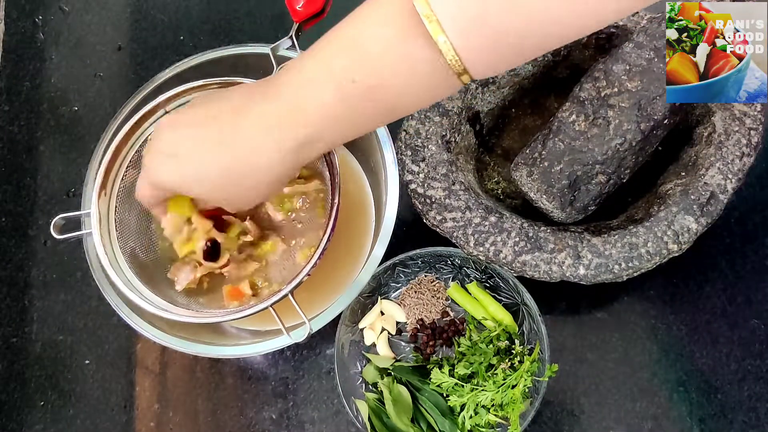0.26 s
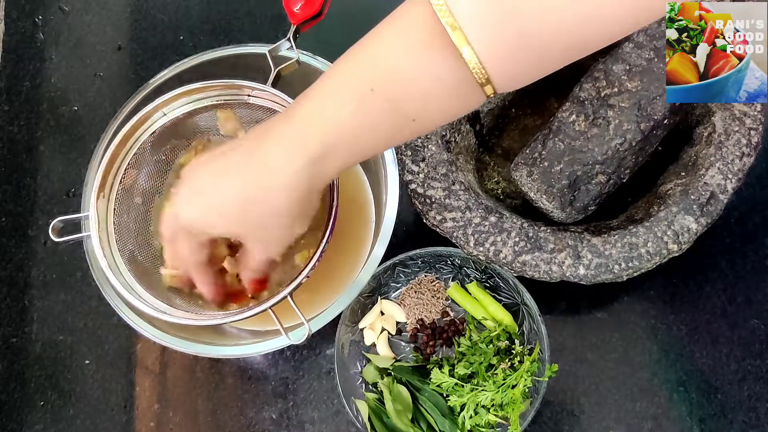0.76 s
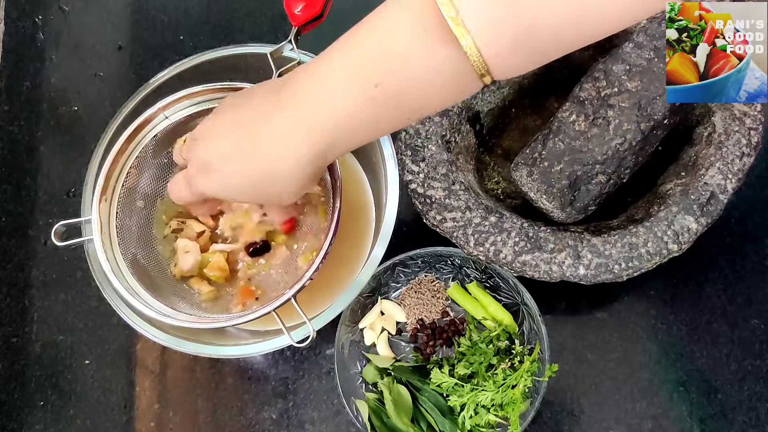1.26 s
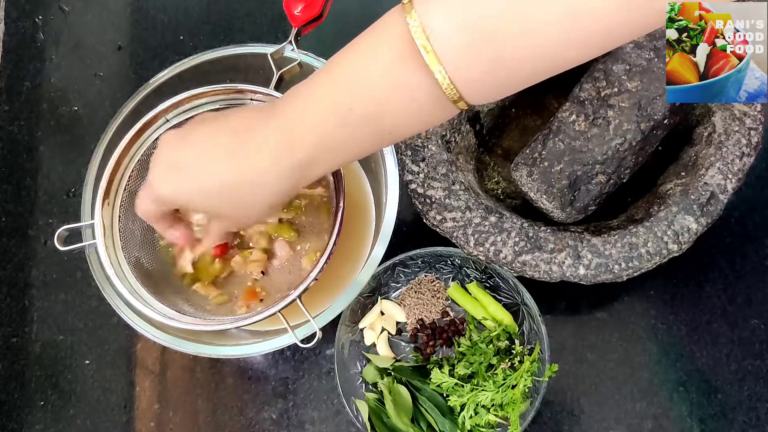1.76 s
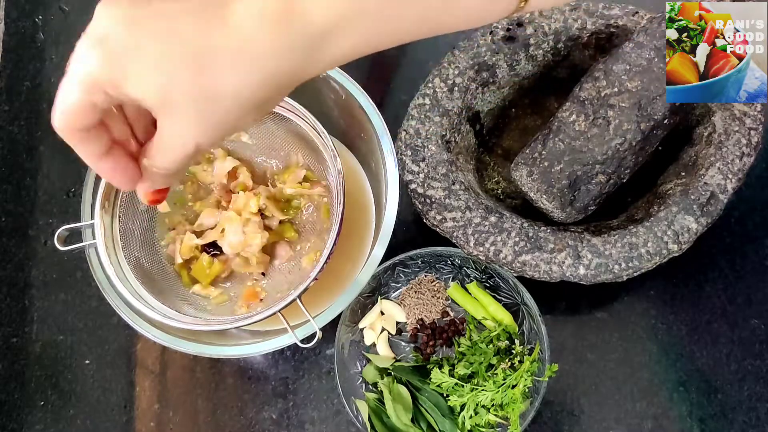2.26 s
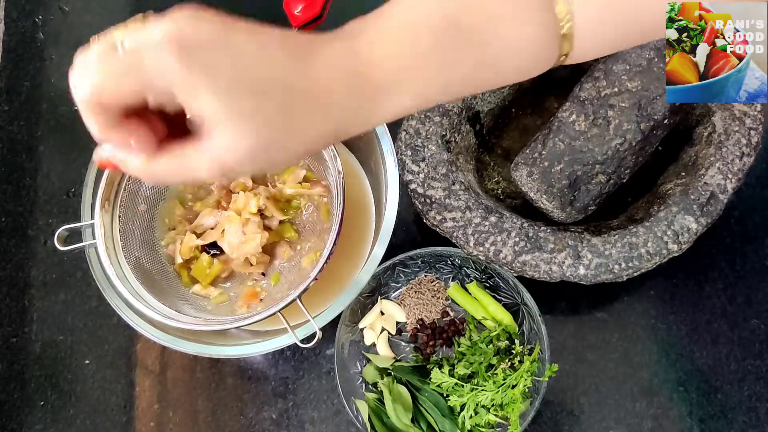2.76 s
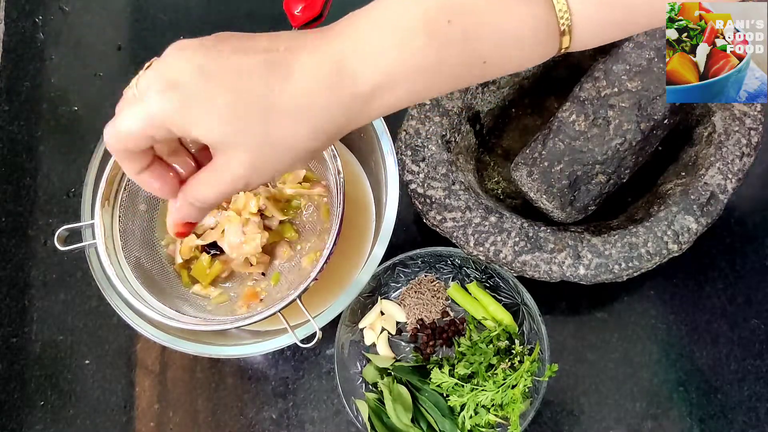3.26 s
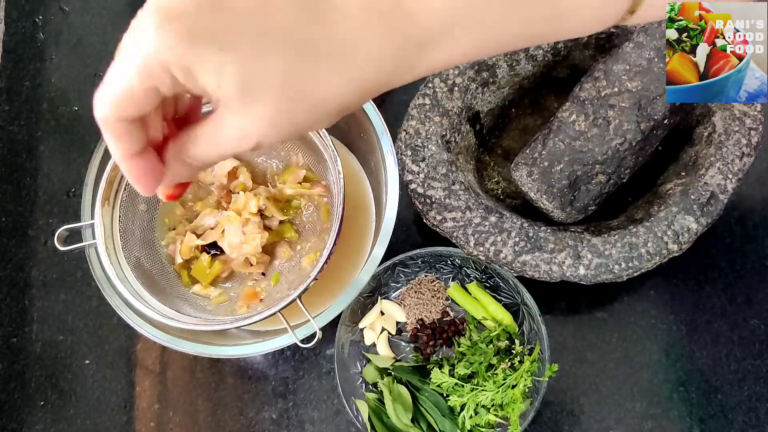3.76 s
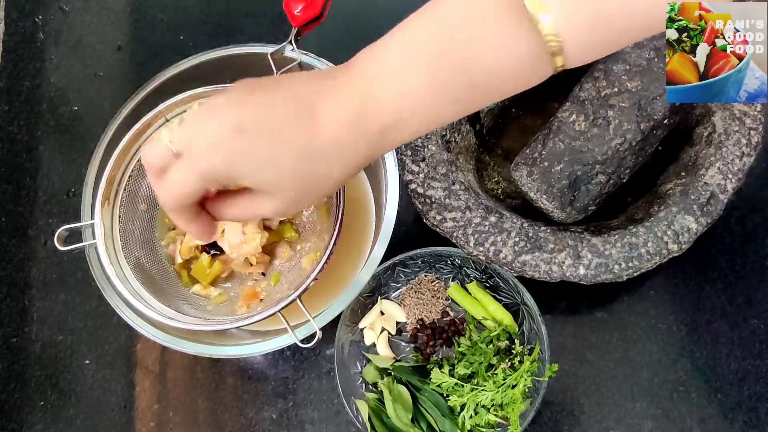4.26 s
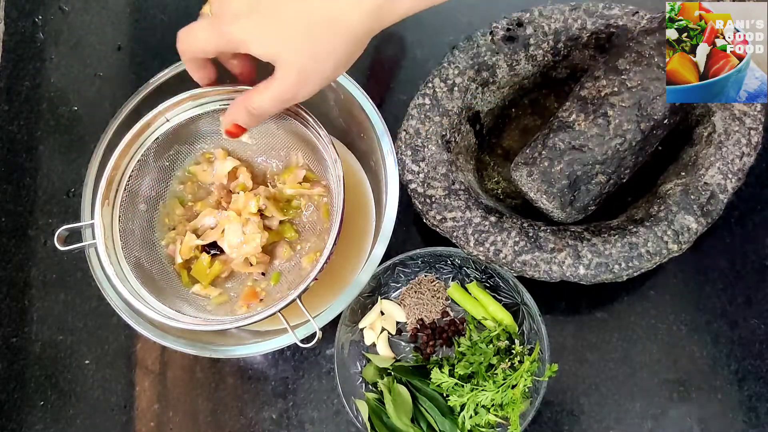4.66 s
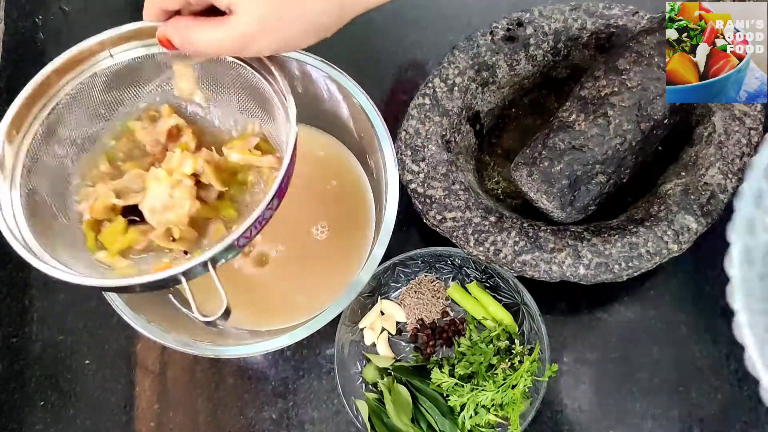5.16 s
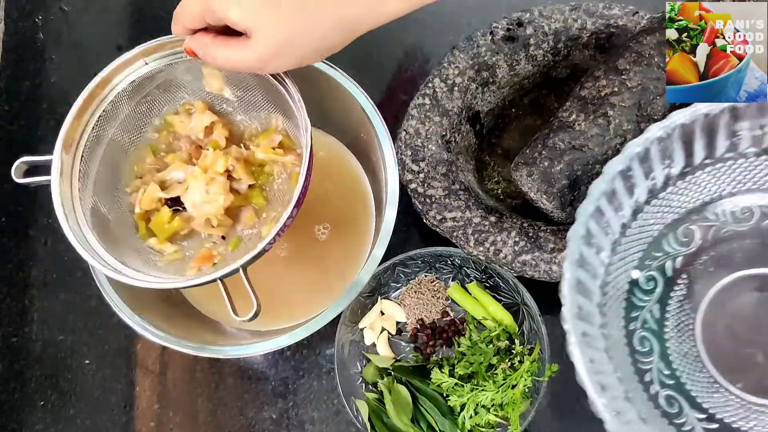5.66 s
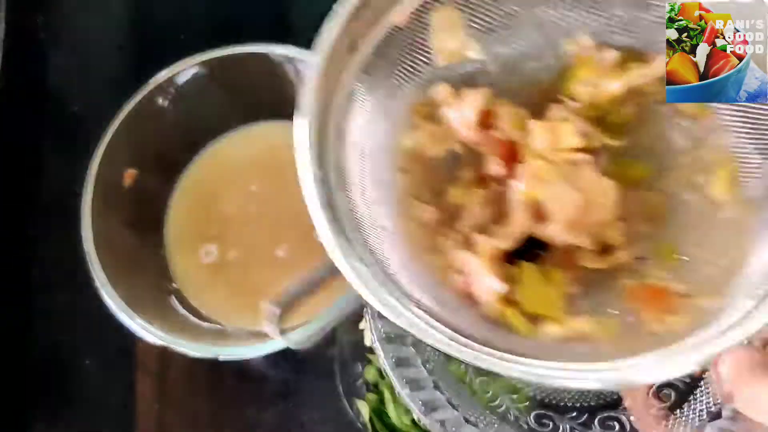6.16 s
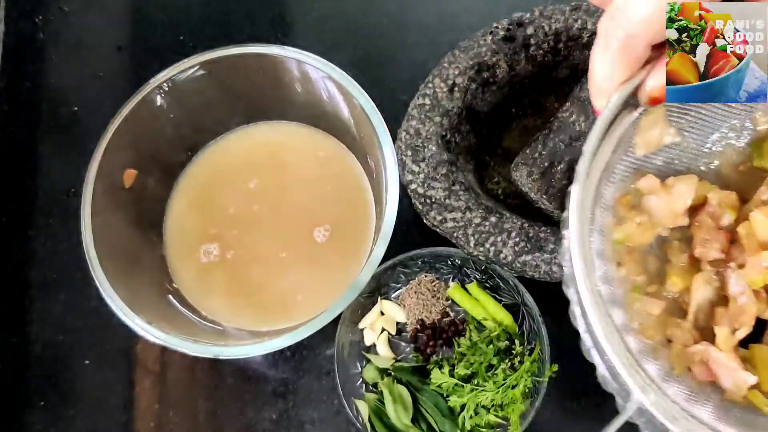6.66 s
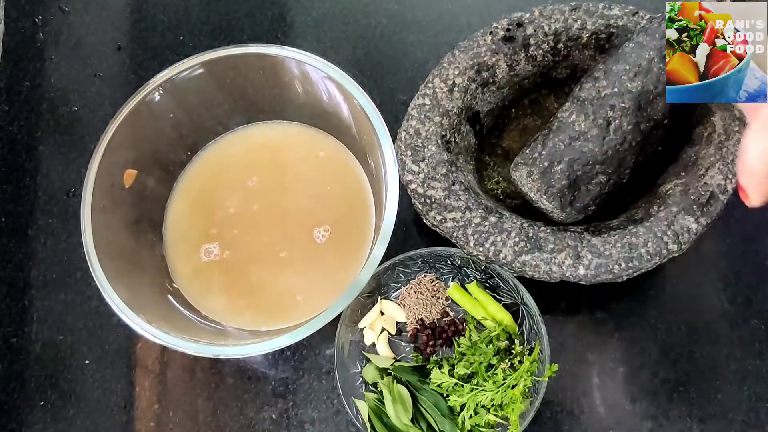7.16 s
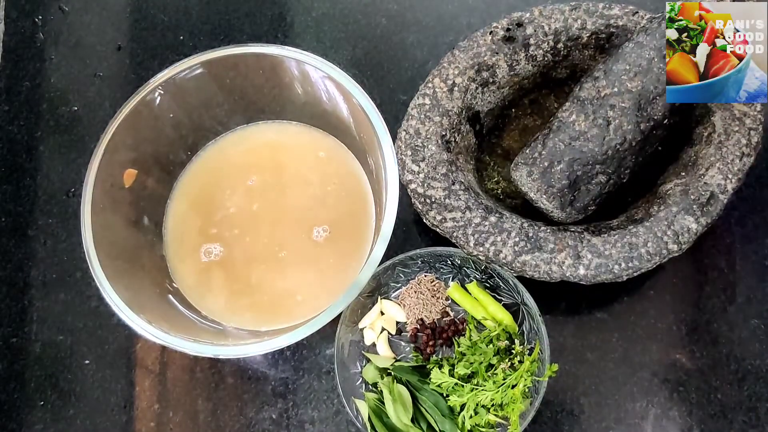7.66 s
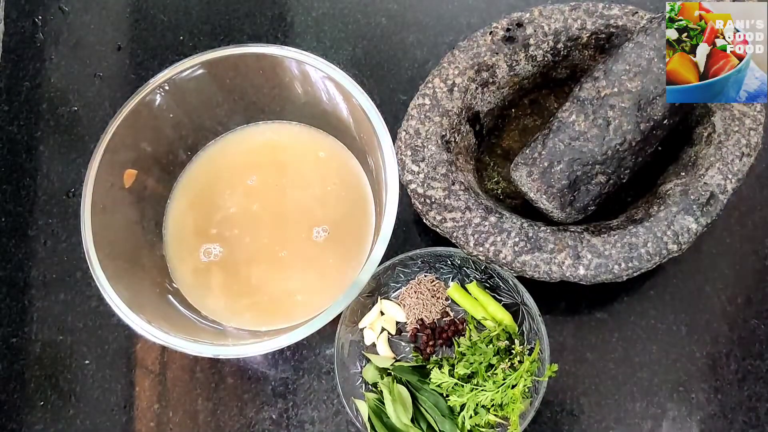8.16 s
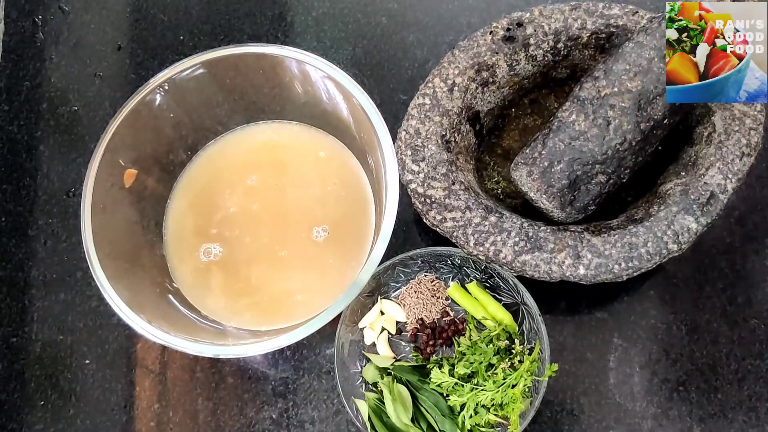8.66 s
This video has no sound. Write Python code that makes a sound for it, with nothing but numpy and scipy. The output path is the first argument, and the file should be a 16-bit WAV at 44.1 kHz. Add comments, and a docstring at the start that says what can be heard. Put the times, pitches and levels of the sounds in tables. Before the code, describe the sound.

A lively kitchen heard in close stereo. From 0 to about 2.7 seconds fingers press wet pulp through a metal strainer slightly to the left: moist crackle, low squelches and popping air pockets, with a sharp snap near 0.45 and more pops around 1.6. Squeezing thins out, with crisp snaps near 3.7 and soft wet rustles from 4.3 to 5; a tiny drip falls at 5.9. A fan's draught rumbles in uneven low gusts, strongest left, over a quiet room drone. Sparrows chirp hoarsely outside throughout, above a distant twittering flock. Light glass and metal touches at 6.6, 6.9 and 7.1 lead to a loud, bright clink at 7.65 with a short room echo. Bangles jingle faintly around 7.4. A nearby bird on the left gives five quick rising whistles from 7.2 to 8.1. One last squelch comes near 8.6.

```python
"""Pressing wet pulp through a strainer

Fingers press pulp through a steel strainer: noise bursts of random clicks, and pops of ringing air pockets.
Strainer and glass plate are set down with a clink, and bangles jingle: damped modes excited by short blows.
A fan's draught rumbles, strongest on the left, over the room's drone: shaped noise and noisy room modes.
Sparrows chatter outside and one bird whistles near: gliding, unsteady sines with diffuse echoes."""
import sys
import numpy as np
from scipy import signal
from scipy.fft import rfft, irfft
from scipy.io import wavfile
from scipy.ndimage import uniform_filter1d

SR = 44100
rng = np.random.default_rng(int(sys.argv[2]) if len(sys.argv) > 2 else 0)


def output_pcm(signal):
    """Save a mono or channel-first signal as 16-bit PCM at the path in sys.argv[1].

    Samples are clipped to [-1, 1] before scaling.
    """
    pcm = np.clip(np.atleast_2d(signal).T, -1, 1) * 32767
    wavfile.write(sys.argv[1], SR, np.round(pcm).astype(np.int16))


N = 393143
MIC_GAP_M, SOUND_SPEED_M_PER_S = .17, 343


def amp(db):
    """Decibel law: 20 dB is a tenfold amplitude."""
    return 10 ** (np.asarray(db) / 20)


def evened(x):
    """Normalization to an rms of 1."""
    return x / np.sqrt(np.mean(x ** 2) + 1e-20)


def slow_noise(length, size):
    """Low-pass filtering: white noise smoothed by two moving averages of size samples, with rms 1."""
    smooth = uniform_filter1d(rng.standard_normal(length), size=size)
    return evened(uniform_filter1d(smooth, size=size))


def read(points, hz):
    """Interpolation of a spectral curve along logarithmic frequency."""
    f, value = np.transpose(points)
    return np.interp(np.log(hz + 1), np.log(f + 1), value)


def curve(rows):
    """Linear interpolation of a level over the time of the scene."""
    return np.interp(np.arange(N) / SR, *np.transpose(rows))


def add(mix, s, sound, lag=0, pan_db=0):
    """Stereo by time and level differences: the left side hears lag samples later and pan_db louder."""
    for side, late, db in ((0, max(lag, 0), pan_db / 2), (1, max(-lag, 0), -pan_db / 2)):
        part = mix[side, round(s * SR + late):][:len(sound)]
        part += amp(db) * sound[:len(part)]


def noise(db_of, length, size, diffuse=True):
    """Diffuse-field coherence: a noise pair of spectrum db_of(Hz, s), alike at both sides only in the bass."""
    frames, hz = 4 * length // size + 5, np.fft.rfftfreq(size, 1 / SR)[:, None]
    a, b, c, d = rng.standard_normal((frames, len(hz), 4)).T
    shared, separate = a + 1j * b, c + 1j * d
    coherence = np.sinc(2 * hz * MIC_GAP_M / SOUND_SPEED_M_PER_S) * diffuse
    z = np.array([shared, coherence * shared + np.sqrt(1 - coherence ** 2) * separate])
    z *= amp(db_of(hz, np.arange(frames) * size / 4 / SR))
    pair = signal.istft(z, nperseg=size, noverlap=3 * size // 4)[1]
    return evened(pair[:, :length])


def reverb(x, t60_of, gap_s):
    """Exponential decay of a diffuse field: the left signal excites a unit-energy tail that dies band by band."""
    tail = noise(lambda hz, t: -60 * t / t60_of(hz), SR, size=256)
    tail = np.pad(tail, ((0, 0), (round(gap_s * SR), 0))) / np.sqrt(SR)
    return signal.oaconvolve(x[:1], tail, axes=1)[:, :N]


def ring(modes, tilt_db=0, spread_db=0):
    """Modal synthesis: a sum of dying sines whose levels vary at random from blow to blow."""
    t = np.arange(SR // 2) / SR
    total = 0
    for hz, db, t60 in modes:
        start_db = db + tilt_db * np.log2(hz / 5000) + spread_db * rng.standard_normal()
        total = total + amp(start_db - 60 * t / t60) * np.sin(2 * np.pi * hz * t)
    return total


def tone(hz, db, taper):
    """Phase is the integral of frequency: a gliding sine of rms level db with tapered ends."""
    phase = 2 * np.pi * np.cumsum(hz) / SR
    return np.sqrt(2) * amp(db) * np.sin(phase) * signal.windows.tukey(len(hz), taper)


def draught():
    """Turbulent pressure is uncorrelated at spaced points: lumpy noise, independent on the two sides."""
    # strength of the draught before lumps and sides: start_s, level_db
    strength = [(0.0, -49), (1.34, -33), (1.37, -41.5), (1.66, -30.5), (1.91, -44.5), (2.38, -30),
                (2.75, -39.5), (2.85, -34.5), (4.37, -35.5), (4.49, -48), (4.57, -35.5), (4.96, -46),
                (5.04, -35), (5.36, -44), (6.11, -37.5), (6.16, -27), (6.2, -41), (8.02, -43.5),
                (8.07, -36), (8.91, -44.5)]
    # relative spectrum of the rumble: frequency_hz, density_db
    rumble = [(15, 2), (45, 1.5), (75, -14), (130, -19), (200, -49), (400, -51), (2000, -110)]
    gusts_per_s, gusty_db = 12, 2.5  # fastest lump rate and rms depth
    windward_db, lee_db = 7.5, -6.5  # the left microphone faces the fan, the right one is sheltered
    t = np.arange(N) / SR
    lumps = evened(sum(np.sin(2 * np.pi * (f * t + rng.random())) / np.sqrt(f)
                       for f in gusts_per_s * np.geomspace(.25, 1, 16)))
    air = noise(lambda hz, t: read(rumble, hz) + 0 * t, N, size=2048, diffuse=False)
    return air * amp(curve(strength) + gusty_db * lumps + [[windward_db], [lee_db]])


def drone():
    """Resonance of an enclosure: broad noise plus narrow noise in each room mode."""
    # relative spectrum of the broad noise of fan, street and a distant flock's twitter: frequency_hz, density_db
    broad = [(20, -10.5), (70, -3), (100, -3.5), (190, -7), (230, -21.5), (400, -17), (800, -23.5),
             (1500, -32), (2800, -37), (4400, -32), (6300, -41), (8000, -47.5), (14000, -49),
             (15500, -50.5)]
    # room modes that the drone excites, before the side balance: frequency_hz, width_hz, rms_db
    room_modes = [(73.8, 8.4, -47.5), (171.6, 20.7, -52.5), (298.6, 34, -53.5), (341, 27, -57.5),
                  (441, 9.7, -71), (495.6, 13, -66), (579.7, 4.3, -66.5), (696, 8.7, -71.5),
                  (995, 9.1, -77.5)]
    broad_db = -46

    def mode_spectrum(hz, t):
        """Resonance curves: the powers of all modes add."""
        power = sum(amp(2 * db) / w / (1 + (2 * (hz - f) / w) ** 2) ** 2 for f, w, db in room_modes)
        return 10 * np.log10(power) + 0 * t

    modes_rms = np.sqrt(sum(amp(2 * db) for f, w, db in room_modes))
    hum = modes_rms * noise(mode_spectrum, N, size=8192) * amp([[-1.5], [1.5]])
    return hum + amp(broad_db) * noise(lambda hz, t: read(broad, hz) + 0 * t, N, size=2048)


def bursts():
    """Exponential growth and decay: levels of crackle and squelch swell to each peak and die away."""
    # pulp and strainer handled; rise and fall span 20 dB, levels are relative within each kind:
    # peak_s, rise_s, fall_s, crackle_db, squelch_db
    squeezes = [(0.23, 0.46, 0.12, -64, -62), (0.46, 0.0065, 0.033, -51, -75),
                (0.65, 0.051, 0.064, -67, -59.5), (0.89, 0.066, 0.046, -68, -65),
                (0.92, .04, 0.4, -73, -64), (1.235, .015, .08, -83, -74), (1.37, 0.2, 0.027, -68.5, -59),
                (1.585, .01, 0.2, -70, -61), (1.81, 0.014, 0.25, -68, -71), (2.34, 0.071, .3, -76, -64),
                (2.54, .025, 0.13, -72, -62), (2.7, .1, .1, -89, -68), (3.668, .008, 0.047, -58.5, -73),
                (3.71, .05, 0.036, -77, -76), (4.386, 0.22, 0.2, -71, -65.5), (4.6, .2, .2, -78, -72),
                (4.682, .15, .2, -72, -80), (4.8, .15, 0.055, -72, -71), (4.994, 0.27, .045, -69.5, -66),
                (8.578, 0.13, 0.2, -65.5, -61.5), (8.684, 0.07, 0.12, -85, -63.5)]
    step = 64  # samples between computed levels
    t = np.arange(N // step + 1) * step / SR
    levels = np.zeros((2, len(t)))
    for s, rise, fall, fine_db, low_db in squeezes:
        levels += amp([[fine_db], [low_db]] - 20 * np.maximum((s - t) / rise, (t - s) / fall))
    return [np.interp(np.arange(N) / SR, t, level) for level in levels]


def crackle(colour, per_s, spread_db):
    """Shot noise: random clicks of very uneven size, coloured by a spectrum."""
    sizes = amp(spread_db * np.minimum(rng.exponential(1, (2, N)), 5))
    struck = rng.random((2, N)) < per_s / SR
    clicks = sizes * struck * rng.choice([-1., 1.], (2, N))
    return evened(irfft(rfft(clicks) * amp(read(colour, np.fft.rfftfreq(N, 1 / SR))), N))


def pocket(hz, ring_t60, spray_db, spray_t60, length):
    """Resonator under repeated excitation: one blow and a dying noise ring an air pocket."""
    t = np.arange(length) / SR
    blows = rng.standard_normal(length) * amp(spray_db - 60 * t / spray_t60)
    blows[0] = 1
    return np.convolve(blows, ring([(hz, 0, ring_t60)])[:length])[:length]


def pulp():
    """Bubble resonance over shot noise: dense tiny snaps, and pops of a brief snap over a lower plop."""
    # relative spectra of fine crackle and low squelch: frequency_hz, density_db
    wet, squelch = [(2500, -31), (4000, 5), (6500, 1.5), (8000, -8), (12000, -7.5), (16000, -20)], [(500, -25), (1100, -8), (1600, 0), (2500, -1.5), (3500, -1.5), (6000, -29),
                                 (16000, -60)]
    # air pockets bursting, levels relative within each kind: start_s, snap_db, snap_hz, plop_db, plop_hz
    pops = [(0.063, -40, 6100, -56, 2450), (0.149, -47, 5640, -58, 1770), (0.179, -55, 6370, -56, 1340),
            (0.365, -55, 6760, -62, 3750), (0.4547, -34, 6200, -67, 4000), (0.458, -36.5, 6100, -68, 3990),
            (0.5042, -53, 6080, -49, 3740), (0.5075, -44, 7600, -64, 3700), (0.5285, -54, 5510, -56, 5300),
            (0.645, -54, 6010, -53, 1230), (0.882, -52, 9500, -69, 1280), (0.887, -48, 9400, -71, 1280),
            (0.9398, -53, 5700, -57, 1760), (1.2353, -47, 10200, -62, 1290),
            (1.0824, -59, 12000, -62, 1300), (1.3049, -51, 7400, -58, 1710), (1.319, -48, 5600, -62, 2000),
            (1.3595, -48, 6470, -55, 2440), (1.362, -56, 13800, -58, 3900),
            (1.5829, -47, 6170, -49.5, 1550), (1.599, -55, 6360, -51, 1220),
            (1.6492, -38.5, 6300, -60, 1240), (1.68, -49, 6260, -53, 1670), (1.8168, -50, 6210, -46, 3340),
            (1.8427, -60, 6000, -60, 2290), (1.869, -52, 6500, -65, 3700), (1.8724, -46, 7100, -56, 3720),
            (1.97, -58, 8050, -63, 2000), (2.1046, -59, 8000, -60, 2000), (2.5374, -50, 5820, -55, 1530),
            (2.5494, -59, 5680, -46, 3830), (3.0225, -61, 9000, -73, 2000), (3.492, -62, 8000, -71, 2000),
            (3.6655, -39, 5460, -75, 1440), (3.668, -51, 9800, -73, 1440), (3.7032, -46, 6040, -71, 2100),
            (3.704, -42, 9600, -65, 2100), (3.7052, -48, 14000, -69, 2100), (3.7806, -50, 5610, -73, 1200),
            (5.2558, -61, 5500, -57, 1780), (5.809, -66, 5560, -54.5, 1520)]
    # juice falling into the bowl: start_s, pitch_hz (at its start), level_db (at its start)
    drip = (5.858, 2570, -52)
    pan_db = 6.5  # the strainer is a little to the left
    fine, low = bursts()
    mix = amp(6) * fine * crackle(wet, 3000, spread_db=2.6)
    mix += amp(1.0) * low * crackle(squelch, 450, spread_db=3.0)
    length = len(np.arange(0, .03, 1 / SR))
    for s, db, hz, plop_db, plop_hz in pops:
        # droplets re-excite the snap; juice refilling the pocket re-excites the plop
        snap = amp(db + 8) * pocket(hz, .0015, -17, 0.01, length)
        plop = amp(plop_db + 7.0) * pocket(plop_hz, .009, -24.0, 0.11, length)
        add(mix, s, snap + plop, lag=-5, pan_db=pan_db)
    s, hz, db = drip
    t = np.arange(0, .012, 1 / SR)
    # the bubble's pitch rises as it nears the surface
    add(mix, s, tone(hz * (1 + 16 * t), db - 60 * t / 0.055, .15))
    return mix


def sparrows():
    """Frequency and amplitude modulation: gliding, hoarse calls, blended with their echoes from the yard."""
    # nearest sparrows outside, levels before the echo mix: start_s, start_hz, end_hz, length_s, level_db
    chirps = [(0.065, 4450, 4700, 0.063, -61), (0.07, 5000, 5100, .05, -63), (0.15, 3600, 3500, .04, -67),
              (0.21, 2590, 2540, .04, -64.5), (0.27, 3980, 4000, .06, -71), (0.11, 4120, 3810, 0.064, -66),
              (0.335, 4490, 4920, 0.087, -63.5), (0.495, 3960, 3530, 0.076, -65),
              (0.5, 4700, 4600, .03, -67), (0.54, 4000, 3800, .04, -65), (0.57, 4850, 4600, 0.07, -65),
              (0.615, 4350, 4150, 0.053, -61), (0.77, 5240, 4950, .045, -67),
              (0.82, 4750, 4450, 0.027, -66), (0.86, 3400, 3350, .03, -62), (0.945, 4970, 4600, 0.067, -61),
              (0.965, 4390, 4050, 0.082, -58.5), (1.095, 5500, 3650, 0.086, -63),
              (1.305, 4700, 4180, 0.077, -61.5), (1.36, 3500, 3510, 0.082, -66),
              (1.55, 3600, 3440, 0.065, -70), (1.67, 4950, 4920, .045, -68), (1.68, 4320, 4100, 0.047, -73),
              (1.73, 4840, 4420, 0.073, -63), (1.83, 4750, 4450, .04, -62), (1.85, 4030, 3350, 0.063, -62),
              (1.945, 4700, 4600, 0.035, -69), (1.99, 4260, 4150, .05, -69), (2.055, 5140, 4200, 0.12, -63),
              (2.22, 4730, 4500, 0.073, -65), (2.24, 4030, 3350, 0.11, -63.5),
              (2.325, 4570, 4500, .05, -64), (2.375, 4250, 4100, 0.054, -66),
              (2.375, 4970, 4780, 0.13, -65.5), (2.535, 3830, 3830, 0.099, -61.5),
              (2.7, 3550, 3490, 0.045, -66), (2.71, 4740, 4280, 0.08, -60), (2.76, 5250, 4850, .07, -64),
              (2.81, 4260, 3900, 0.078, -63), (2.99, 4030, 3780, 0.04, -65), (3.11, 5070, 4780, 0.16, -68),
              (3.19, 4310, 4070, 0.059, -62), (3.295, 4300, 3680, 0.035, -63), (3.38, 5400, 5200, .04, -66),
              (3.425, 4700, 3870, 0.058, -66), (3.49, 5380, 5380, .06, -71), (3.57, 5070, 4300, 0.06, -66),
              (3.635, 4550, 4350, 0.024, -61), (3.63, 5920, 5550, 0.04, -58), (3.7, 5650, 5530, 0.066, -73),
              (3.96, 4950, 3680, 0.13, -65), (4.005, 3950, 2940, 0.063, -59),
              (4.03, 4740, 4030, 0.074, -58), (4.17, 5300, 5220, 0.069, -67),
              (4.295, 4680, 3650, 0.037, -64), (4.32, 3850, 3640, .03, -57), (4.41, 4630, 4350, 0.05, -64),
              (4.44, 4920, 4370, .06, -62), (4.51, 4150, 3800, .03, -61), (4.52, 4900, 4950, 0.058, -63),
              (4.58, 5050, 4970, .08, -65), (4.785, 4520, 4270, 0.067, -64), (4.83, 3610, 3560, 0.055, -62),
              (4.915, 4580, 4500, 0.061, -60), (4.92, 5720, 5490, 0.045, -57),
              (4.97, 4200, 3340, 0.037, -59.5), (5.095, 4480, 4040, 0.097, -63),
              (5.255, 4840, 4100, 0.068, -60.5), (5.38, 3730, 3720, 0.027, -66),
              (5.46, 4300, 3600, 0.06, -67), (5.6, 4700, 4240, 0.035, -60),
              (5.66, 4590, 4000, 0.073, -60.5), (5.745, 4630, 3720, 0.11, -62),
              (5.93, 4540, 4100, 0.048, -66), (6.055, 5040, 3750, 0.084, -59), (6.14, 4340, 4070, .04, -57),
              (6.265, 4700, 4300, 0.029, -64), (6.405, 4170, 4130, 0.062, -57),
              (6.405, 5900, 5470, 0.04, -57.5), (6.455, 5100, 4470, 0.044, -61),
              (6.59, 4650, 4540, 0.027, -61), (6.635, 3620, 3530, 0.06, -62.5),
              (6.68, 4950, 4830, .06, -67), (6.92, 4500, 4120, 0.057, -65), (7.01, 6300, 5980, 0.027, -57),
              (7.025, 5700, 5380, .04, -53.5), (7.04, 4580, 3740, 0.076, -57.5),
              (7.14, 6250, 6100, .02, -59), (8.04, 4570, 4530, 0.027, -56.5),
              (8.18, 4750, 4400, 0.039, -59), (8.22, 4140, 3870, .05, -61),
              (8.395, 4680, 4130, 0.075, -56.5), (8.5, 6280, 5640, 0.045, -59),
              (8.535, 4570, 4010, 0.17, -63), (8.7, 4540, 4410, 0.051, -59),
              (8.72, 4300, 4100, 0.064, -60.5), (8.81, 4390, 4110, 0.067, -63)]
    flock_db, flock_per_s = -83, 130  # lowest level and rate: a far flock, blurred into a band of twitter
    chatter_db, chatter_per_s = -75, 22  # lowest level and rate: fainter sparrows, still heard one by one
    yard_t60 = 0.33  # s
    calls = list(chirps)
    for a, b, c, d in rng.random((round(flock_per_s * N / SR), 4)):
        height = b ** 1.5
        calls.append((a * N / SR, 3600 + 3200 * height, 3000 + 2800 * height + 500 * c,
                      0.0399 + 0.0697 * c, flock_db + 7 * d))
    for k, (a, b, c, d) in enumerate(rng.random((round(chatter_per_s * N / SR), 4))):
        calls.append(((k + a) / chatter_per_s, 3900 + 1500 * b, 3500 + 900 * b + 300 * c,
                      0.0304 + 0.0495 * c, chatter_db + 5 * d))
    waver, throb = slow_noise(N + SR, 60), slow_noise(N + SR, 350)
    far = np.zeros((2, N))
    for s, hz0, hz1, length, db in calls:
        u = np.arange(0, 1, 1 / (length * SR))
        hoarse_hz = 70 * waver[round(s * SR):][:len(u)]
        uneven_db = db + 2 * throb[round(s * SR):][:len(u)]  # each call breaks into uneven beads
        add(far, s, tone(hz0 + (hz1 - hz0) * u + hoarse_hz, uneven_db, 0.18))
    return amp(-4) * far + amp(-1.2) * reverb(far, lambda hz: yard_t60, .004)


def crockery():
    """Impact excitation: each touch is a crack that rings plate and counter, with one early reflection."""
    # strainer and plate touch; levels before the stereo mix, tilts in dB per octave, pitch and length are
    # factors on the knock, since the rim lands at another spot each time:
    # start_s, glass_db, crack_db, knock_db, tilt_db, pitch_factor, length_factor, knock_tilt_db
    knocks = [(6.614, -53, -59, -50, 3, 1.03, .35, -5.5), (6.871, -46, -49, -37, -4.5, 1, 0.79, -2),
              (7.109, -35, -36, -34, -3, 1.04, 0.86, 0.5), (7.6493, -5.5, -22.5, -29.5, 0.5, 1.07, 1, 2.5)]
    # glass plate, damped by the hand, relative levels: frequency_hz, level_db, t60_s
    plate = [(825, -26, 0.12), (1674, -30, .2), (1730, -28, .12), (1770, -26, 0.12), (1976, -32, .15),
             (3278, -33, .15), (500, -25, .07), (610, -30, .05), (1864, -22, 0.07), (2130, -29, 0.12),
             (2400, -33, 0.093), (4280, -35, 0.2), (3362, -26, .18), (3395, -32, .12), (5990, 6, .009),
             (6836, -21, .14), (6970, -20, .1), (7122, -2, .034), (7400, -14, .03), (11040, -15, .055),
             (13364, -6, .055), (5043, -1, .042), (5047, -28, .42), (5094, -13, .05), (5127, -12, .06),
             (5255, -29, .25), (5338, -28, .2), (6923, -21, .12), (7639, -24, .09), (9300, -26, .08),
             (9911, -28, .1), (10340, -20, .04), (11430, -26, .1), (11810, -24, .1), (13100, -14, .015),
             (13540, -28, .08), (14720, -31, .09)]
    # strainer rim on the stone counter, relative levels before pitch and length: frequency_hz, level_db, t60_s
    counter = [(510, -10, 0.035), (964, -0.5, 0.065), (1190, -1, 0.04), (1310, 1, 0.013), (1490, -1, 0.025),
               (1983, -7.5, 0.098), (2340, -6, 0.02), (3405, 3.5, 0.055)]
    # relative spectrum of the broad burst of a touch: frequency_hz, density_db
    crack_colour = [(400, -9), (1000, -6), (2000, -1.5), (3000, -13), (4500, -15), (6000, 6.5),
                    (7300, -7.5), (8300, -17), (10000, -8), (13500, -4.5), (16000, -40)]
    mix, t = np.zeros((2, N)), np.arange(SR // 2) / SR
    swell = 1 - np.exp(-t / 0.00066)  # the plate takes a moment to ring in
    for s, glass_db, crack_db, knock_db, tilt_db, pitch, length, knock_tilt_db in knocks:
        # the small offset keeps the logarithm finite at 0 Hz
        crack = noise(lambda hz, _: read(crack_colour, hz) + tilt_db * np.log2(hz / 5000 + 0.0092),
                      len(t), size=256)
        crack = crack * amp(crack_db - 60 * t / 0.061)
        rim = [(hz * pitch, db, t60 * length) for hz, db, t60 in counter]
        knock = amp(knock_db) * ring(rim, knock_tilt_db, spread_db=1.5)
        glass = amp(glass_db) * swell * ring(plate, tilt_db, spread_db=1.3)
        add(mix, s, amp(-6.0) * (glass + knock) + crack[0], lag=18, pan_db=1.5)
        # the counter top throws the touch back 1.36 ms later
        add(mix, s + .00136, amp(-9) * (glass + knock) + crack[1], lag=9, pan_db=-3)
    return mix


def whistle(climb, start_hz, top_hz, db, onset_db, hold, droop_hz):
    """Frequency modulation: a climb levels off and fades, then the pitch flicks up to a loud top and droops."""
    knee_hz, knee_db = 5000, -19  # where the climb levels off; level relative to the top
    climb_bend, flick_bend, flick_s = 1.7, 1.5, 0.027  # the flick speeds up
    fade_db = -6  # change over the held top
    flutter_db, hoarse_hz = 3.5, 45  # rms unevenness of level and pitch
    u, v, w = (np.arange(0, 1, 1 / (length * SR)) for length in (climb, flick_s, hold))
    hz = np.r_[knee_hz - (knee_hz - start_hz) * (1 - u) ** climb_bend,
               knee_hz + (top_hz - knee_hz) * v ** flick_bend,
               top_hz - droop_hz * w ** 2]
    swell_db = np.r_[onset_db + (knee_db - onset_db) * u, knee_db * (1 - v) ** 2, fade_db * w]
    flutter = slow_noise(len(hz), 300)
    hz = hz + hoarse_hz * slow_noise(len(hz), 80)
    return tone(hz, db + swell_db + flutter_db * flutter, 0.086)


def near_bird():
    """Direct and diffuse sound: rising whistles from the left, each with a short echo."""
    # whistles, levels before the echo mix, onset relative to the top, droop within the hold:
    # start_s, climb_s, start_hz, top_hz, level_db, onset_db, hold_s, droop_hz
    whistles = [(7.18, 0.055, 4600, 6360, -45, -9, .022, 120),
                (7.406, 0.066, 3740, 6830, -45, -4.5, 0.009, 50),
                (7.627, 0.063, 3770, 6900, -49, -5, .008, 100),
                (7.845, 0.062, 3510, 6680, -47.5, -2.5, 0.0137, 600),
                (8.06, 0.064, 3410, 6420, -45, -6, 0.016, 60)]
    sill_t60 = 0.36  # s
    near = np.zeros((2, N))
    for s, *call in whistles:
        add(near, s, whistle(*call), lag=-8, pan_db=7)  # the window is on the left
    return amp(-0.5) * near + amp(-6) * reverb(near, lambda hz: sill_t60, 0.0061)


def bangles():
    """Modes under repeated impact: light metal rings clink and chatter briefly, unlike at each touch."""
    # bangles on the wrist touch, relative levels: start_s, level_db
    jingles = [(7.387, -50), (7.414, -58), (7.438, -64), (7.464, -61)]
    # modes of the thin metal, relative levels: frequency_hz, level_db, t60_s
    metal = [(5150, 0, .02), (7700, -9, .015), (9340, -7, 0.072), (9600, -13, .15), (10300, -7, .03),
             (10870, -7, .05), (11600, -6, .04), (12190, -12, .12), (12800, -8, .07), (13230, -11.5, .15)]
    rattle_db, rattle_t60 = -17, .045  # the rings chatter on after a touch; decay in s
    mix, t = np.zeros((2, N)), np.arange(0, rattle_t60, 1 / SR)
    for s, db in jingles:
        rattle = rng.standard_normal(len(t)) * amp(rattle_db - 60 * t / rattle_t60)
        rattle[0] = 0.37  # the first blow
        add(mix, s, amp(db) * signal.fftconvolve(rattle, ring(metal, spread_db=2)), lag=0, pan_db=-7)
    return mix


def scene():
    """Superposition: hands and dishes with the kitchen's reverberation, birds, drone and draught."""
    # reverberation of the kitchen: frequency_hz, t60_s
    kitchen = [(300, 0.71), (1000, 0.62), (3000, 0.87), (7000, 0.44), (15000, 0.28)]
    hands, dishes = pulp(), crockery() + bangles()
    room = reverb(amp(-6.5) * hands + amp(-11.5) * dishes, lambda hz: read(kitchen, hz), .004)
    return hands + dishes + room + sparrows() + near_bird() + drone() + draught()


def record(dry):
    """Band limitation: a linear-phase low-pass filter removes the highest treble."""
    edge_hz = 15600
    low_pass = signal.firwin(511, edge_hz, window=("kaiser", 9), fs=SR)
    return signal.oaconvolve(dry, low_pass[None], "same")


dry = scene()
out = record(dry)
output_pcm(out)
```